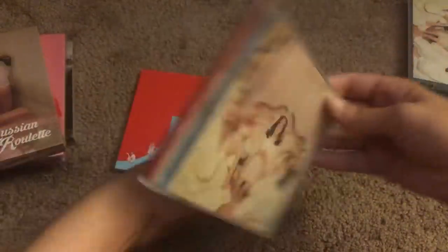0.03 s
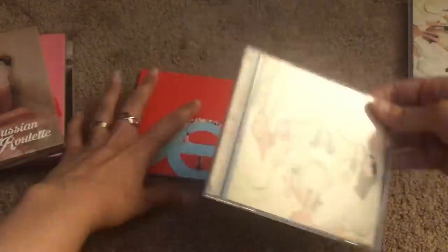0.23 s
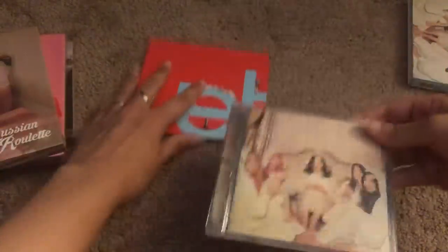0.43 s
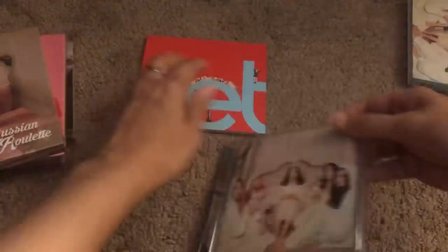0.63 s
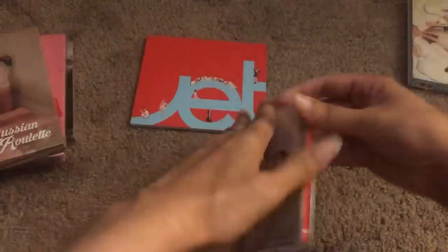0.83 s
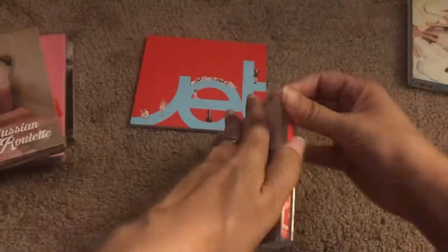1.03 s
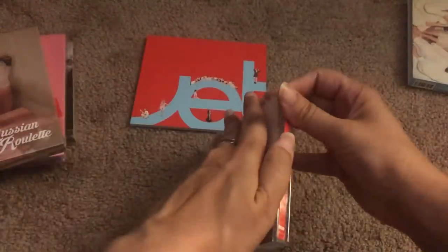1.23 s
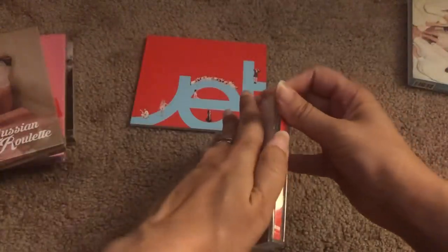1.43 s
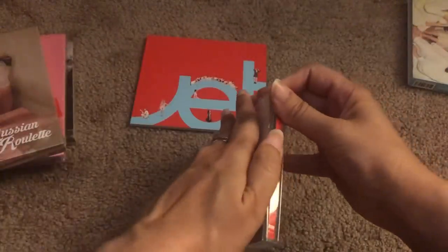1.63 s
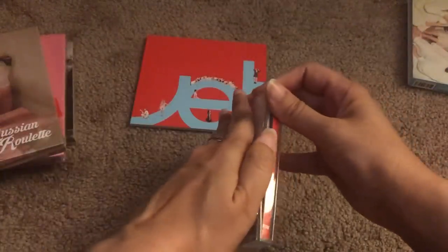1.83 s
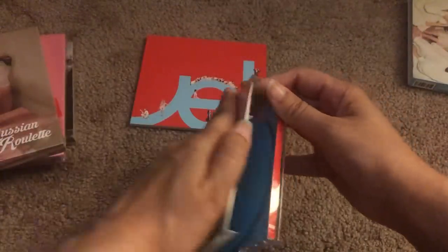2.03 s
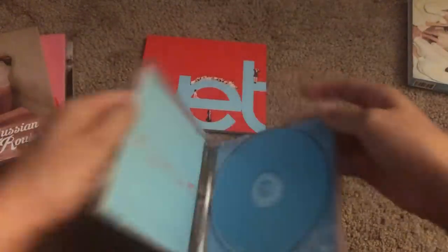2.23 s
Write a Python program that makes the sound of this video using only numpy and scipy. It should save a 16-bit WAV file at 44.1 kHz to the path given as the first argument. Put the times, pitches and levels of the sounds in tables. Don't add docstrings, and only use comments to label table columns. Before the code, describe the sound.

Close up in a small quiet room, thin plastic clacks and fingers slide over it, dull thuds touch carpet, a pause follows, then tiny stick-slip creaks, a sharp catch snap and loose lid knocks.

```python
import sys
import numpy as np
from scipy import signal
from scipy.fft import rfft, irfft
from scipy.io import wavfile

SR = 44100
rng = np.random.default_rng(int(sys.argv[2]) if len(sys.argv) > 2 else 0)


def ratio(d):
    e = np.asarray(d, float) / 20
    return 10 ** e


def transcribe(signal):
    frames = np.atleast_2d(signal).T
    limited = np.clip(frames, -1, 1)
    pcm = np.round(limited * 32767).astype(np.int16)
    wavfile.write(sys.argv[1], SR, pcm)


N = 100856

# f/Hz, level/dB
AIR_SPECTRUM = [(12, -42), (20, -2), (222, -4), (301, -5.5), (446, -4.5), (718, -16.5), (5230, -27),
                (6010, -25), (16000, -33.5)]
AIR_DB = -69
HUM_HZ, HUM_WIDTH_HZ, HUM_DB = 65.4, 17.2, -71

# t/s, level/dB
BRUSHING = [(0, -59), (.13, -73.5), (.29, -68), (.43, -58), (.55, -63.5), (.63, -70), (.72, -63),
            (.88, -64), (1.0, -68.5), (1.15, -67), (1.23, -76.5), (1.9, -89), (2.03, -66), (2.1, -70.5),
            (2.2, -61.5), (2.28, -64)]
# f/Hz, level/dB
CARPET_SPECTRUM = [(88, -39), (150, -17), (254, -4.5), (504, -11.5), (566, -9.5), (1120, -6), (3350, -10),
                   (14800, -24.5), (16000, -20.5)]
BRUSHING_DB = 0.94

# start/s, length/s, level/dB, share of the length spent rising
STROKES = [(0, 0.019, -73, 0.092), (0.041, 0.046, -54, 0.28), (.076, 0.045, -46.5, 0.65),
           (0.152, 0.024, -57.5, 0.36), (0.301, 0.037, -56.5, 0.54), (0.331, 0.035, -63, 0.33),
           (0.6, 0.023, -53.5, 0.63), (0.651, 0.034, -62, .3), (0.724, 0.034, -55.5, 0.59),
           (0.794, 0.031, -57.5, 0.47), (0.855, 0.066, -62.5, 0.37), (0.936, 0.025, -60, 0.38),
           (1.004, 0.033, -60.5, 0.33), (2.007, 0.08, -59, .1), (2.103, 0.037, -56.5, 0.76),
           (2.143, 0.035, -51, 1), (2.219, 0.096, -57, 0.5)]
# f/Hz, level/dB
SKIN_SPECTRUM = [(180, -25), (300, -17.5), (1690, 0.5), (2000, -2.5), (2740, -5), (5700, -5.5),
                 (11900, -15), (16000, -9.5)]
GRAINS_PER_S, GRAIN_SIZE_DB = 14000, 2.0

# t/s, peak level/dB, f/Hz, t60/s
THUD_EVENTS = [(.09, -52.5, 166, 0.086), (0.8, -44, 220, .03), (0.807, -47.5, 454, 0.036),
               (.94, -56, 445, 0.051), (0.024, -49.5, 129, 0.063), (.030, -48, 410, 0.033),
               (1.795, -53, 260, 0.034), (1.894, -54, 233, 0.044), (1.991, -47.5, 246, 0.05),
               (1.993, -43, 170, 0.069), (2.15, -42.5, 218, 0.024), (1.99, -49, 137, 0.081),
               (1.998, -47.5, 91, 0.14), (2.132, -60, 352, 0.03), (2.192, -52, 300, 0.034),
               (2.216, -49, 291, 0.064)]
THUD_RISE_CYCLES = 0.5

# t/s, peak level/dB, treble share/dB,
# body f/Hz, t60/s
CASE_TICKS = [(0.0296, -34.5, 11.5, 1600, 0.019), (0.085, -33, -22, 1670, 0.025),
              (0.097, -32.5, 0.5, 1980, 0.021), (0.1108, -39.5, -12, 2200, 0.019),
              (0.1411, -35.5, -19, 2280, 0.019), (0.156, -37, -4, 1630, 0.015),
              (0.387, -45.5, -1.5, 1500, 0.017), (0.461, -64, -2, 2500, 0.018),
              (0.5171, -36, -2.5, 2600, 0.023), (0.8062, -39, 2.5, 2660, 0.031),
              (0.8251, -34, -5, 2260, 0.013), (0.837, -41, -7, 2600, 0.024),
              (0.9402, -46.5, -3.5, 1480, 0.039), (.950, -41.5, -24, 1940, 0.045),
              (0.956, -45, -15, 2260, 0.035), (1.1309, -50.5, -21, 1440, 0.02),
              (1.2465, -46.5, -25, 1380, 0.024),
              (1.7136, -50, -15, 1620, 0.011), (1.7924, -42, -1.5, 1870, 0.024),
              (1.7958, -45, -12, 3460, 0.051), (1.8921, -40, -14.5, 1900, 0.042),
              (1.974, -59, -13, 3500, 0.024), (2.002, -36, 0.5, 1490, 0.029), (2.0395, -53, 6, 2110, 0.025),
              (2.128, -34.5, -13, 1830, 0.033), (2.1722, -40, 1.5, 4800, 0.051),
              (2.1848, -50, 7, 1000, 0.015), (2.2125, -43.5, 9, 2770, 0.016),
              (2.225, -43.5, -5, 2900, 0.045)]
# f/Hz, level/dB, t60/s
SHELL_MODES = [(521, -9.5, 0.052), (860, -6.5, 0.046), (1020, -6.5, 0.024), (1233, -2, 0.03),
               (1364, 1.5, 0.016), (1515, -2, 0.041), (1665, -3, .024), (1910, -3, 0.022),
               (2340, -6.5, 0.011), (2770, -9, 0.032), (3124, -12.5, 0.017), (3756, -1, 0.031),
               (610, -13.5, 0.025), (5160, -21, 0.022)]
BODY_WIDTH = 0.63
TICK_SPREAD = 0.0256
TREBLE_LOW_HZ, TREBLE_FALL_HZ, TREBLE_T60_SHARE = 2900, 5000, 0.59
TREBLE_DB, TICK_DB, SHELL_DB = 5, -3.5, -16.5
FIRST_TOUCH = 4.7

# f/Hz, level/dB, t60/s
TURNED_MODES = [(676, -20.5, 0.031), (826, -23, .025), (1156, 0, 0.014), (1320, 1, .014), (1500, 1, 0.015),
                (1967, -1, 0.019), (2600, -4, 0.027), (3110, -5.5, 0.016), (3760, -3, 0.017),
                (4300, -2.5, 0.015), (4910, -1.5, 0.013), (5800, -5.5, 0.009)]
# f/Hz, level/dB, t60/s
LAID_MODES = [(1235, -5.5, 0.015), (1600, -4, 0.02), (2450, 0, 0.011), (2820, -2.5, 0.017),
              (4330, 0, 0.012), (4700, -0.5, 0.015), (5820, -6.5, 0.0083), (9000, 0, 0.011)]
# f/Hz, level/dB, t60/s
PRIED_MODES = [(524, -8, 0.036), (603, -11.5, .025), (916, -10, 0.033), (1400, -5.5, 0.023),
               (1754, -1, 0.022), (2025, -4, 0.016), (2420, -12.5, 0.029), (2845, -3.5, 0.019),
               (3110, -1, .02), (4660, -5, 0.017)]
# f/Hz, level/dB, t60/s
OPEN_MODES = [(348, -10, 0.021), (660, -12.5, 0.011), (1010, -3, 0.01), (1310, -5, 0.017),
              (1650, -1, 0.015), (2344, 1, 0.013), (3700, -1.5, 0.019), (4570, -7.5, 0.014)]
# t/s, peak level/dB, bending spread/s^.5, contact cut f/Hz
TURNED_CLACKS = [
    (.0298, -20.5, 0.0075, 11900),
    (.1562, -38, 0.019, 5000),
]
LAID_CLACKS = [
    (.8064, -29.5, 0.0197, 12000),
    (.8255, -39, 0.044, 1780),
    (.8372, -43, 0.0283, 4000),
    (.9414, -38, 0.029, 1500),
]
PRIED_CLACKS = [
    (1.7927, -35, 0.021, 9000),
    (1.7955, -47.5, 0.021, 9000),
    (1.8938, -36, 0.011, 2010),
    (1.8965, -47, 0.018, 1810),
]
OPEN_CLACKS = [
    (2.1285, -34.5, 0.022, 8100),
    (2.1848, -38.5, .09, 1500),
    (2.2125, -47, 0.1008, 2970),
]

# start/s, length/s, level/dB, f/Hz
EDGE_SONGS = [
    (0.33, 0.27, -60.5, 1010),
    (0.32, 0.29, -65.5, 1550),
    (0.41, 0.204, -69, 680),
    (2.167, 0.0091, -49.5, 5200),
    (2.155, .025, -58, 7800),
    (0.815, 0.12, -62.5, 1870),
    (1.2, 0.044, -66.5, 1400),
    (1.065, 0.16, -69, 1600),
    (2.16, 0.095, -63, 276),
]
SONG_SPAN = 1.326

# t/s, peak level/dB
LID_SLIPS = [(1.37, -57), (1.456, -53), (1.467, -48), (1.478, -47.5), (1.484, -55), (1.506, -53.5),
             (1.5339, -48), (1.5525, -42.5), (1.566, -43), (1.5759, -43.5), (1.5908, -51.5), (1.682, -51.5),
             (1.757, -51), (1.771, -46.5), (1.7803, -42.5)]
# f/Hz, level/dB, t60/s
EDGE_MODES = [(1790, -4, 0.0024), (2830, -3.5, 0.0059), (3790, -4, 0.0087), (4670, -4.5, 0.0077)]
SLIP_SPREAD, SLIP_LAG_S = 0.02, 0.0006
SLIP_LOW_HZ, SLIP_HIGH_HZ = 1090, 1930
SLIP_DB, SLIP_UPPER_DB, SLIP_EDGE_DB = 1.0, -2.5, -8.0
SCATTER_DB, SCATTER_T60_S = -27.0, 0.03

SNAP_S, SNAP_DB, SNAP_SPREAD = 1.9906, -18.5, 0.0058
CRACK_DB, CRACK_T60_S = -24.5, 0.012
LEAD_S, LEAD_DB = 0.0074, -28.5
RATTLE_DB, RATTLE_T60_S, FIZZ_DB = -22.5, 0.067, -39.5

ROOM_T60_S, ROOM_DB, WALL_CUT_HZ = 0.14, -21.5, 5800
TOP_CUT_HZ, TOP_CUT_DB = 15900, -29.0

TIME = np.arange(N) / SR
T = np.arange(8192) / SR
CLICK = (T == 0) + 1e-18


def rms_one(x):
    return x / np.sqrt(np.mean(x ** 2) + 1e-20)


def peak_one(x):
    return x / np.max(np.abs(x))


def fade(t60):
    return ratio(-60 * T / t60)


def band(x, low_hz, high_hz):
    edges = [low_hz, min(high_hz, 0.45 * SR)]
    return signal.sosfilt(signal.butter(2, edges, "band", fs=SR, output="sos"), x)


def coloured(x, points):
    hz, db = np.transpose(points)
    pitch = np.log(np.fft.rfftfreq(len(x), 1 / SR) + 1)
    gain = ratio(np.interp(pitch, np.log(hz), db))
    return rms_one(irfft(rfft(x) * gain, len(x)))


def drift(rate):
    r = np.exp(-2 * np.pi * rate / SR)
    wander = signal.lfilter([1], [1, -2 * r, r * r], rng.standard_normal(N + SR))
    return rms_one(wander[SR:])


def modes(x, table, jitter_db):
    out = 0
    for (hz, db, t60), luck in zip(table, rng.standard_normal(len(table))):
        r = ratio(-60 / (t60 * SR))
        w = 2 * np.pi * hz / SR
        ring = signal.lfilter([0, np.sin(w)], [1, -2 * r * np.cos(w), r * r], x)
        out = ratio(db + jitter_db * luck) * ring - out
    return out


def bent(x, spread):
    hz = np.fft.rfftfreq(2 * len(x), 1 / SR)
    turn = 2 * np.sqrt(hz) - hz / np.sqrt(hz[-1])
    return irfft(rfft(x, 2 * len(x)) * np.exp(-2j * np.pi * spread * turn))[:len(x)]


def add(out, s, x):
    i = int(s * SR)
    out[i:i + len(x)] += x[:N - i]


def air():
    noise = coloured(rng.standard_normal(N), AIR_SPECTRUM)
    low = band(rng.standard_normal(N + SR), HUM_HZ - HUM_WIDTH_HZ, HUM_HZ + HUM_WIDTH_HZ)
    return ratio(AIR_DB) * noise + ratio(HUM_DB) * rms_one(low[SR:])


def carpet_brushing():
    s, db = np.transpose(BRUSHING)
    noise = coloured(rng.standard_normal(N), CARPET_SPECTRUM)
    low = band(noise, 120, 2100)
    flickering = low * ratio(3.3 * drift(25)) + (noise - low) * ratio(1.1 * drift(54))
    return ratio(np.interp(TIME, s, db) + BRUSHING_DB) * flickering


def finger_slides():
    stroke = 0
    for s, length, db, rise in STROKES:
        top = s + length * np.clip(rise, 0.05, 0.95)
        stroke = stroke + ratio(db) * np.interp(TIME, [s, top, s + length], [0, 1, 0]) ** 0.83
    present = rng.random(N) < GRAINS_PER_S / SR
    size = ratio(GRAIN_SIZE_DB * np.minimum(rng.exponential(1, N), 4))
    grains = present * size * rng.choice([-1, 1], N)
    return stroke * ratio(1.6 * drift(135)) * coloured(grains, SKIN_SPECTRUM)


def thuds():
    out = np.zeros(N)
    for s, db, hz, t60 in THUD_EVENTS:
        swell = 1 - np.exp(-T * hz / THUD_RISE_CYCLES)
        add(out, s, ratio(db) * fade(t60) * swell * np.sin(2 * np.pi * hz * T))
    return out


def ticks():
    out = np.zeros(N)
    fall = np.exp(-2 * np.pi * TREBLE_FALL_HZ / SR)
    for s, db, treble_db, hz, t60 in CASE_TICKS:
        low, high = rng.standard_normal((2, len(T))) + FIRST_TOUCH * CLICK
        body = band(low * fade(t60), hz * BODY_WIDTH, hz / BODY_WIDTH)
        body = peak_one(band(body, hz / 2, 11700))
        treble = signal.lfilter([1], [1, -2 * fall, fall ** 2], high * fade(t60 * TREBLE_T60_SHARE))
        treble = peak_one(band(treble, TREBLE_LOW_HZ, 19800))
        shell = peak_one(modes(CLICK, SHELL_MODES, jitter_db=4.0))
        shell = band(band(shell, hz / 2, hz * 3.0), hz / 2, 15000)
        whole = body + ratio(treble_db + TREBLE_DB) * treble + ratio(SHELL_DB) * shell
        add(out, s, ratio(db + TICK_DB) * bent(whole, TICK_SPREAD))
    return out


def clacks():
    out = np.zeros(N)
    grips = ((TURNED_CLACKS, TURNED_MODES), (LAID_CLACKS, LAID_MODES),
             (PRIED_CLACKS, PRIED_MODES), (OPEN_CLACKS, OPEN_MODES))
    for events, grip in grips:
        for s, db, spread, cut_hz in events:
            soft = np.exp(-2 * np.pi * cut_hz / SR)
            touch = signal.lfilter([1], [1, -2 * soft, soft ** 2], CLICK)
            ring = modes(touch, grip, jitter_db=0.5)
            add(out, s, ratio(db) * peak_one(bent(ring, spread)))
    return out


def edge_songs():
    out = 0
    noise = rng.standard_normal(N) * ratio(1.2 * drift(40))
    for s, length, db, hz in EDGE_SONGS:
        swell = np.sin(np.pi * np.clip((TIME - s) / length, 0, 1)) ** 0.51
        out = out + ratio(db) * swell * rms_one(band(noise, hz / SONG_SPAN, hz * SONG_SPAN))
    return out


def lid_pulse(step, hz):
    return peak_one(band(band(step, hz * 0.78, hz / 0.78), hz * 0.7, hz / 0.7))


def creak():
    out = np.zeros(N)
    for s, db in LID_SLIPS:
        scatter = ratio(SCATTER_DB) * fade(SCATTER_T60_S) * rng.standard_normal(len(T))
        step = CLICK + scatter
        late = np.roll(step, int(SLIP_LAG_S * SR))
        low, upper = lid_pulse(late, SLIP_LOW_HZ), lid_pulse(late, SLIP_HIGH_HZ)
        edge = peak_one(band(modes(step, EDGE_MODES, jitter_db=1.5), 1300, 9000))
        whole = low + ratio(SLIP_UPPER_DB) * upper + ratio(SLIP_EDGE_DB) * edge
        add(out, s, ratio(db + SLIP_DB) * peak_one(bent(whole, SLIP_SPREAD)))
    return out


def snap():
    out = np.zeros(N)
    strike_noise, crack_noise, rattle_noise = rng.standard_normal((3, len(T)))
    growth = (T < LEAD_S) * (T / LEAD_S) ** 3
    add(out, SNAP_S - LEAD_S, ratio(LEAD_DB) * band(strike_noise * growth, 870, 5400))
    strike = strike_noise * fade(0.0068) * 0.15 + CLICK
    ring = band(modes(strike, SHELL_MODES, jitter_db=0), 300, 18000)
    add(out, SNAP_S, ratio(SNAP_DB) * peak_one(bent(ring, SNAP_SPREAD)))
    add(out, SNAP_S, ratio(CRACK_DB) * band(crack_noise * fade(CRACK_T60_S), 2400, 20000))
    rattle = rattle_noise * fade(RATTLE_T60_S) * np.minimum(T / 0.007, 1)
    add(out, SNAP_S, ratio(RATTLE_DB) * band(rattle, 890, 3150))
    add(out, SNAP_S, ratio(FIZZ_DB) * band(crack_noise * fade(RATTLE_T60_S), 2600, 12000))
    return out


def room(x):
    noise = rng.standard_normal(len(T)) * fade(ROOM_T60_S) * np.minimum(T / 0.012, 1)
    tail = band(noise, 120, WALL_CUT_HZ)
    return signal.fftconvolve(x, tail / np.sqrt(np.sum(tail ** 2)))[:N]


def scene():
    case = finger_slides() + thuds() + ticks() + clacks() + creak() + snap()
    return (case + ratio(ROOM_DB) * room(case) + carpet_brushing() + edge_songs() + air())[None]


def band_limit(x):
    return signal.sosfilt(signal.butter(12, 17000, fs=SR, output="sos"), x)


def record(dry):
    hz = np.fft.rfftfreq(N, 1 / SR)
    low_cut = np.minimum(hz / 35, 1) ** 2
    top_cut = ratio(TOP_CUT_DB * np.clip((hz - TOP_CUT_HZ) / 200, 0, 1))
    mix = irfft(rfft(dry) * top_cut * low_cut, N)
    return band_limit(mix)


dry = scene()
out = record(dry)
transcribe(out)
```